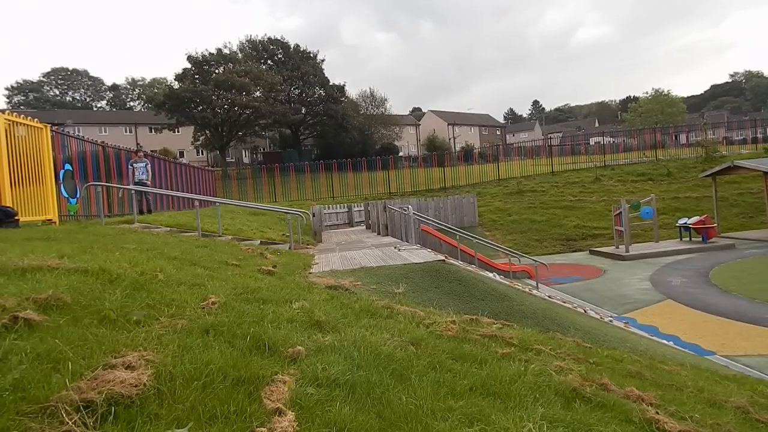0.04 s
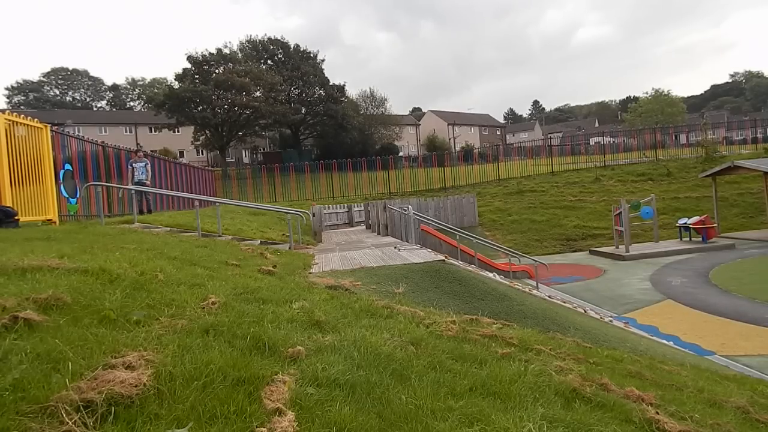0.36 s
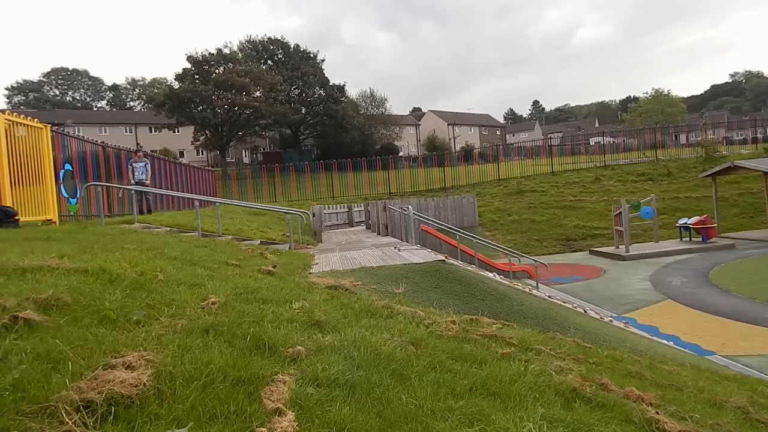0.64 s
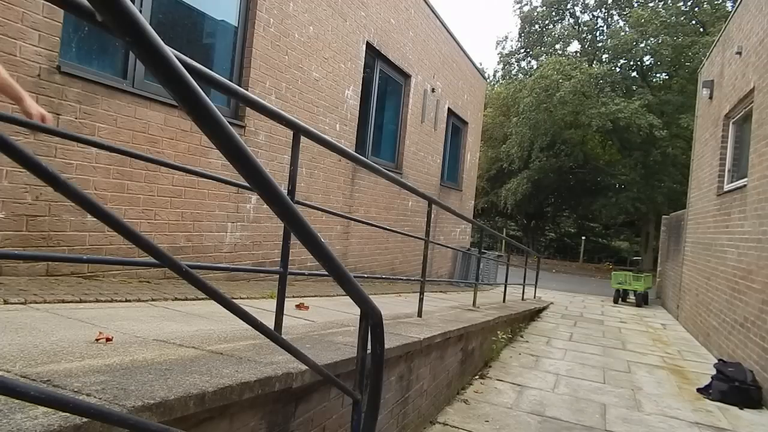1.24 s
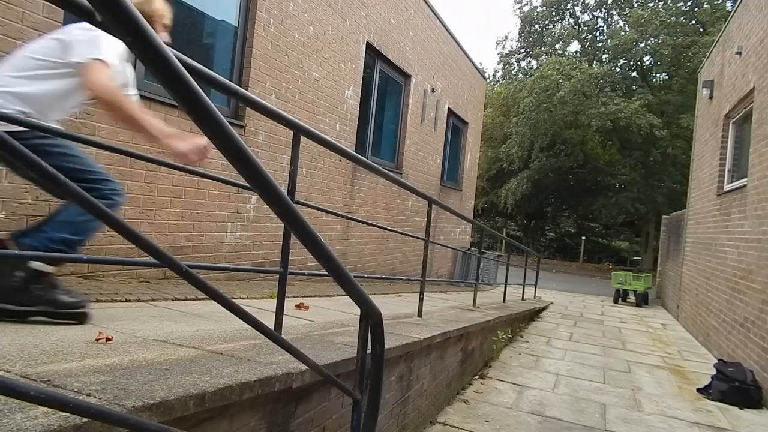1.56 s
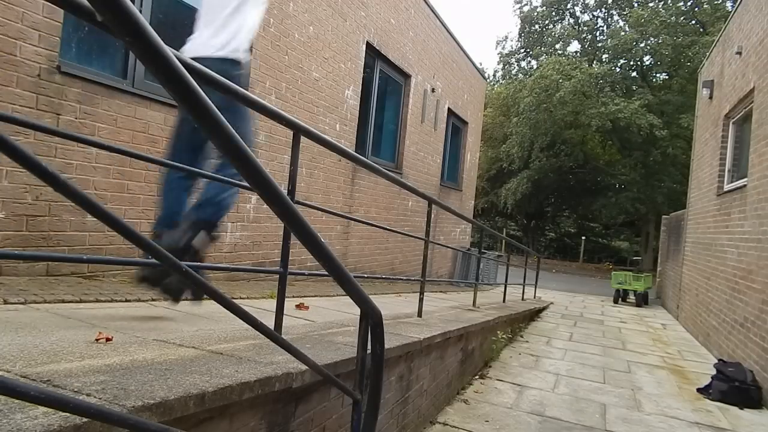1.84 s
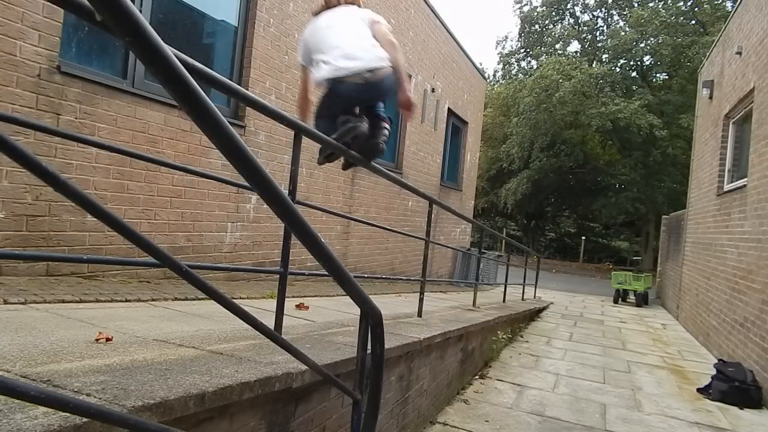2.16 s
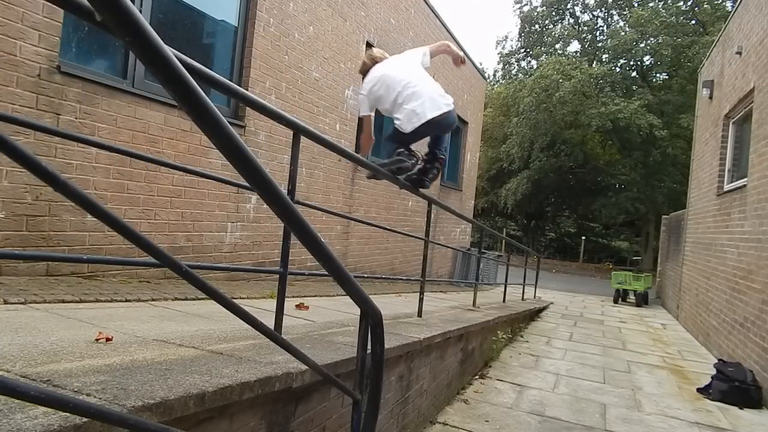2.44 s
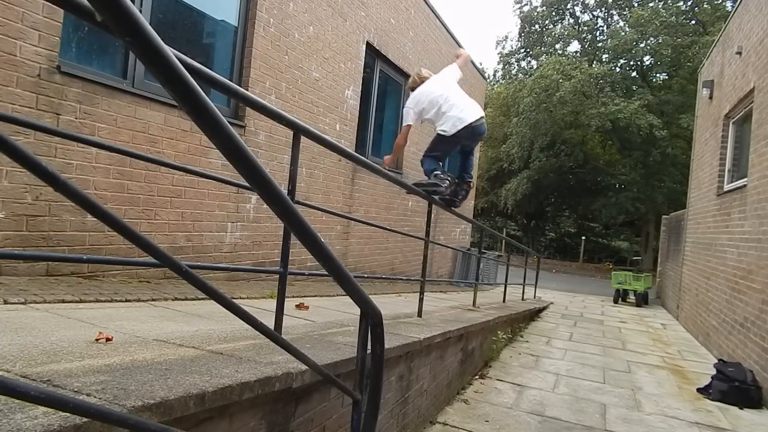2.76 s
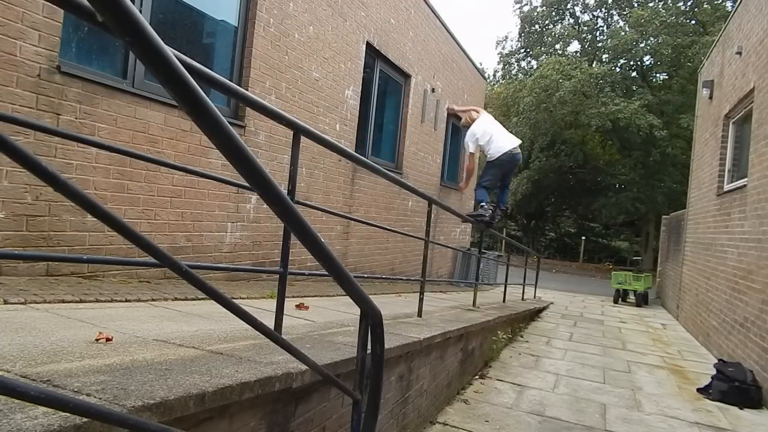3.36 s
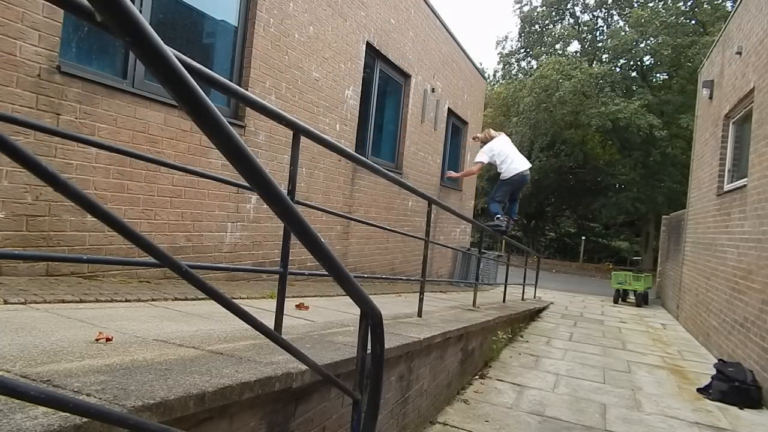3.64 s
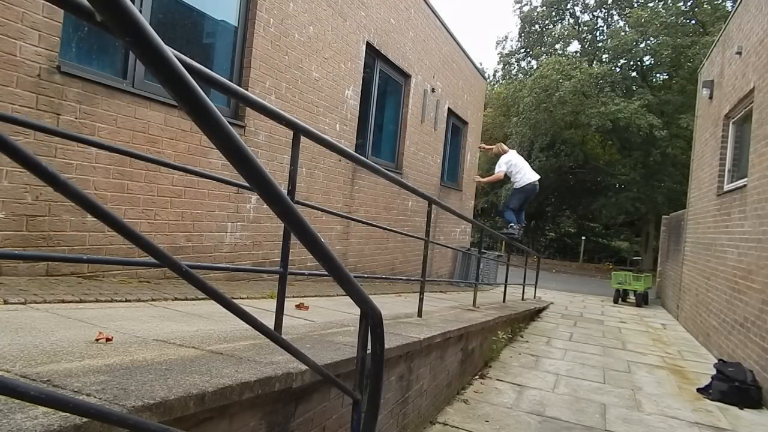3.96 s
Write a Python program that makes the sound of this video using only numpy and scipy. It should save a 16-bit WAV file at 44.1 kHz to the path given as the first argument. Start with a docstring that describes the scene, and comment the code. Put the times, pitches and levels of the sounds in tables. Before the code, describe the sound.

An inline skater, first distant under a light breeze, is abruptly near the microphone in a brick yard. Hard wheels thump and clatter over paving, then the boots hit a metal rail and scrape along as it rings.

```python
"""An inline skater rolls far off in a playground, over a low breeze. From 0.8 s he is close by in a
brick yard: hard wheels roar, thump and clack over paving slabs, and the hollow boots drone.
He jumps, clips a steel handrail at 2.0 s, lands on it with both boots at 2.2 s and grinds along it
while the tube rings, bumping over a joint at 3.3 s. Brick walls answer the blows."""
import sys
import numpy as np
from scipy import signal
from scipy.fft import rfft, irfft, next_fast_len
from scipy.io import wavfile
from scipy.ndimage import map_coordinates

SR = 44100
rng = np.random.default_rng(int(sys.argv[2]) if len(sys.argv) > 2 else 0)


def pcm_store(signal):
    """Save signal as 16-bit PCM."""
    levels = np.round(np.clip(np.atleast_2d(signal), -1, 1) * 32767)
    wavfile.write(sys.argv[1], SR, levels.astype(np.int16).T)


N = 176400
YARD_S, GRIND_S = 0.798, 2.205

# Each row: time in seconds, then scrape, tube ring, hiss and rumble levels in dB.
GRIND_LEVELS = [(2.2, -35, -25.5, -52, -47), (2.3, -26, -27.5, -44, -26.5),
                (2.44, -32.5, -27.5, -51.5, -35.5), (2.58, -32, -30.5, -47.5, -33),
                (2.78, -24.5, -26, -42, -28.5), (2.95, -27, -28, -44.5, -26.5),
                (3.2, -26.5, -27, -44.5, -33.5), (3.42, -23.5, -30.5, -41, -28.5),
                (3.68, -23, -32, -41.5, -28.5), (3.85, -25.5, -33.5, -45, -30),
                (3.99, -26, -24.5, -44.5, -30.5)]
# Friction noise. Each row: frequency in Hz, relative level in dB.
SCRAPE_SPECTRUM = [(100, -14), (270, 0.5), (410, 8.5), (560, 2), (680, 3), (800, -1), (1200, 1),
                   (1600, -1.5), (2200, -6.5), (3000, -14), (4200, -16.5), (7000, -37), (15000, -58)]
GRIND_HISS_SPECTRUM = [(1500, -15), (3300, 0.5), (5000, 5), (7500, 0.5), (10000, 1.5), (12000, 1.5),
                       (15500, -12)]
def grind():
    """The soles chatter along the rail, scraping, hissing and keeping the tube ringing."""
    scrape, ring, hiss, rumble = gains(GRIND_LEVELS)
    contact = fade_in(GRIND_S, 0.02)
    chatter = amp(0.97 * wobble(70))
    scraping = scrape * noise(SCRAPE_SPECTRUM, grit_db=1.5)
    hissing = hiss * noise(GRIND_HISS_SPECTRUM, grit_db=0.5)
    friction = contact * chatter * (scraping + hissing)
    singing = ring * contact * singing_tube()
    body = contact * rumble * amp(0.93 * wobble(20)) * noise(RUMBLE_SPECTRUM)
    wet = amp(-7)  # further off, so more echo
    return (friction + wet * walls(friction)) / np.hypot(1, wet) + singing + body


# Steel tube. Each row: frequency in Hz, width in Hz, relative level in dB, time of strongest drive
# in seconds, fall either side in dB per second.
TUBE_MODES = [(209, 4, -6, 3.2, 6), (330, 6, -11, 3.1, 6), (370.6, 3, -.5, 3.0, 5), (401.5, 12, -5, 2.9, 2),
              (435.3, 2, 2, 2.8, 1), (478, 4, -3, 3.3, 2), (511.2, 2, 5, 2.75, 11), (660, 7, -9, 3.5, 6),
              (805, 3, -11, 3.3, 4), (1152, 5, -13, 3.3, 4), (1460, 4, -11, 3.6, 5),
              (1736, 4, -12.5, 3.0, 2), (2215, 5, -22, 3.0, 2), (2690, 5, -28, 3.0, 2),
              (3172, 4, -21, 2.2, 16), (3778, 5, -27, 2.3, 4), (3952, 12, -27, 2.6, 2),
              (4514, 8, -30, 2.8, 2), (5130, 8, -30, 3.4, 2)]
def singing_tube():
    """Sliding sustains the modes; each swells as the boot passes the spot that drives it best."""
    t, out = clock(), np.zeros(N)
    flutter_db, wander_rad = 3, 0.8
    for hz, width_hz, db, best_s, fall_db_per_s in TUBE_MODES:
        level = amp(db - fall_db_per_s * np.abs(t - best_s) + flutter_db * wobble(17))
        phase = 2 * np.pi * (hz * t + rng.random()) + wander_rad * wobble(2 * width_hz)
        out += level * np.sin(phase)
    return unit(out)


# Boots striking the rail, then jolting on it. Each row: start in seconds, smack in dB, smack t60 in
# seconds, treble in dB, thud in dB, crack in dB. Levels are relative.
LANDINGS = [(2.02, -18.5, 0.14, 1, -12.5, -34), (2.1751, -13.5, 0.15, 5, -45, -11.5),
            (2.202, -18.5, 0.34, 7, -39, -14), (2.21, -9, 0.048, -9, -12.5, -7.5),
            (2.606, -25, 0.034, -9, -33, -26), (2.852, -28.5, 0.027, -17, -30, -31),
            (3.0763, -24, 0.026, -22, -24, -18), (3.599, -23, 0.033, -12, -32, -23),
            (3.668, -22, 0.044, -18, -26, -24)]
# Impact noise. Each row: frequency in Hz, relative level in dB.
SMACK_SPECTRUM = [(100, -37), (400, -2), (750, 1), (1100, -2), (1700, -1), (2400, 1), (3200, -6),
                  (4500, -11), (7500, -19), (11000, -18.5), (15500, -37)]
THUD_SPECTRUM = [(40, -56), (140, 9), (270, -9.5), (400, 6.5), (700, -10), (1100, -13), (2000, -9.5),
                 (4000, -45), (12000, -36)]
def landings():
    """Plastic soles hit the rail: a hard crack, a bright smack and the thud of the skater's weight."""
    out, t = np.zeros((2, N)), np.arange(SR // 4) / SR
    for start_s, db, t60_s, treble_db, thud_db, crack_db in LANDINGS:
        envelope = amp(db) * decay(t, t60_s, attack_s=0.002)
        envelope += amp(crack_db) * decay(t, t60_s=0.015, attack_s=0.00059)
        smack = envelope * noise(SMACK_SPECTRUM, size=len(t), grit_db=1.0, treble_db=treble_db)
        thud = amp(thud_db) * decay(t, t60_s=0.12) * noise(THUD_SPECTRUM, size=len(t))
        add(out, start_s, smack + thud)
    return out


# A sole on the loaded rail. Each row: frequency in Hz, width in Hz, relative gain in dB.
CLANK_MODES = [(628, 34, 2), (772, 30, -6), (1040, 43, -13), (1630, 83, -2), (1860, 34, -4),
               (2110, 42, -11), (2370, 35, -10), (2920, 55, -0.5), (3140, 22, -3), (3690, 22, -1)]
def struck_rail(hits):
    """Each blow sounds directly, clanks briefly and rings the tube's narrow modes."""
    clank = resonate(hits, CLANK_MODES)
    ring = resonate(hits, [row[:3] for row in TUBE_MODES])
    return amp(-2) * hits + amp(-3.5) * clank + amp(-5) * ring


def bump():
    """A dull knock and a little clank as the sole crosses a joint of the rail."""
    knock = amp(-14) * swell(peak_s=3.295, rise_s=0.0075, fall_s=0.011) * noise(THUD_SPECTRUM)
    return knock + amp(-3) * resonate(knock, CLANK_MODES)


# Wheels and boots striking slabs. Each row: start in seconds, clatter in dB, clatter t60 in seconds,
# treble in dB, ring frequency in Hz, ring level in dB.
CLACKS = [(0.2296, -35, .04, -1, 1520, -32), (0.8128, -20, 0.03, 0, 671, -5.5),
          (0.8148, -23.5, 0.096, -1, 440, -5.5), (0.8379, -24.5, 0.079, -15, 480, -6.5),
          (0.924, -27.5, 0.28, -19, 1290, -45), (1.019, -23.5, 0.1, -26, 410, -17),
          (1.141, -22.5, 0.11, -9, 830, -19), (1.167, -17.5, 0.2, -5, 1084, -5),
          (1.184, -22.5, 0.13, -6, 1294, -7), (1.253, -23.5, 0.18, -14, 1120, -17),
          (1.319, -30.5, 0.071, 17, 375, -13), (1.337, -20, 0.095, -6, 1050, -34),
          (1.382, -16.5, 0.097, 1, 580, -14), (1.4749, -9.5, 0.06, -4, 955, -12.5),
          (1.48, -15, 0.08, 0, 249, -11), (1.54, -22.5, 0.13, 8.5, 1500, -15.5),
          (1.558, -24, 0.12, 7, 1620, -14.5), (1.7035, -23.5, 0.1, -3, 394, -12),
          (1.711, -29, 0.027, 0, 414, -10), (1.721, -28, 0.072, 1, 405, -13),
          (1.807, -25, 0.28, 0, 398, -15), (1.866, -31.5, 0.13, 2, 392, -38)]
# Frame rattle. Each row: frequency in Hz, relative level in dB.
CLATTER_SPECTRUM = [(60, -27), (200, -14), (420, 4.5), (700, -7.5), (1150, 2), (1700, -3), (2600, -15),
                    (4500, -25.5), (7500, -31.5), (10500, -26), (15500, -42)]
def clacks():
    """Each strike cracks, rattles the frame and briefly rings two modes of the boot shell."""
    out, t = np.zeros((2, N)), np.arange(SR // 5) / SR

    def mode(hz):
        return decay(t, t60_s=0.042 * np.sqrt(400 / hz), attack_s=0.00073) * np.sin(2 * np.pi * hz * t)

    crack = amp(-8) * decay(t, t60_s=0.0067)
    for start_s, db, t60_s, treble_db, ring_hz, ring_db in CLACKS:
        envelope = decay(t, t60_s, attack_s=0.001) + crack
        clatter = amp(db) * envelope * noise(CLATTER_SPECTRUM, size=len(t), treble_db=treble_db)
        ring = amp(ring_db) * (mode(ring_hz) + amp(-12.5) * mode(1.413 * ring_hz))
        add(out, start_s, clatter + ring)
    return out


# Each row: start in seconds, peak in dB, frequency in Hz.
JOINT_THUMPS = [(0.108, -31.5, 111), (0.343, -30.5, 111), (.548, -36.5, 84), (0.719, -39.5, 95),
                (.921, -15.5, 153), (1.14, -15, 131), (1.188, -16, 133), (1.211, -16, 125),
                (1.254, -14, 140), (1.311, -17, 125), (1.339, -12, 132), (1.355, -16, 127),
                (1.387, -8.5, 135), (1.713, -16.5, 101), (1.8, -27, 125), (1.883, -24, 222)]
def thumps():
    """A few low cycles as a wheel drops into a paving joint."""
    out, t = np.zeros((2, N)), np.arange(SR // 8) / SR
    rise_s = 0.0063
    envelope = (t / rise_s * np.exp(1 - t / rise_s)) ** 1.08
    for start_s, db, hz in JOINT_THUMPS:
        add(out, start_s, amp(db) * envelope * np.sin(2 * np.pi * hz * t))
    return out


# Each row: time in seconds, then wheel, ground rumble and hiss levels in dB.
ROLL_LEVELS = [(.8, -34, -38, -43), (.95, -34, -26.5, -52.5), (1.1, -33.5, -30.5, -54.5),
               (1.2, -33.5, -30, -49), (1.4, -30, -27.5, -47.5), (1.6, -35, -32.5, -51),
               (1.78, -35, -31.5, -52), (1.89, -36.5, -31, -47), (1.97, -37, -37.5, -52.5),
               (2.2, -35, -30, -48)]
# Rolling noise; the grind shares the rumble. Each row: frequency in Hz, relative level in dB.
WHEEL_SPECTRUM = [(150, -46), (290, -15), (400, 2.5), (560, -8.5), (750, -10), (1100, -10), (1650, -12.5),
                  (2600, -21.5), (4500, -35.5), (9000, -50)]
RUMBLE_SPECTRUM = [(20, -40), (45, -15), (75, -7), (125, -3), (165, -0.5), (220, -14.5), (300, -19),
                   (600, -27), (2000, -74)]
WHEEL_HISS_SPECTRUM = [(1500, -15), (3500, 0.5), (7500, -3.5), (10500, 0.5), (15500, -7.5)]
def rolling():
    """Hard wheels on rough slabs: a gritty roar and a faint hiss over a ground rumble."""
    wheel, ground, hiss = gains(ROLL_LEVELS)
    roar = wheel * noise(WHEEL_SPECTRUM) * amp(1.15 * wobble(70.3))
    rumble = ground * noise(RUMBLE_SPECTRUM) * amp(1.1 * wobble(25.15))
    gate = fade_in(YARD_S, 0.0039) * (1 - fade_in(GRIND_S, 0.068))
    return gate * (roar + rumble + hiss * noise(WHEEL_HISS_SPECTRUM))


# Each row: time in seconds, level in dB.
DRONE_LEVELS = [(.8, -42), (1.1, -41.5), (1.35, -34), (1.5, -32), (1.66, -29), (1.73, -43), (1.8, -30),
                (1.95, -47), (2.2, -50)]
# Boot shell. Each row: frequency in Hz, width in Hz, relative gain in dB.
SHELL_MODES = [(262, 58, -5), (405, 26, 3)]
def boot_drone():
    """Rolling keeps the hollow boots droning until the landing."""
    level, = gains(DRONE_LEVELS)
    vibration = noise([(100, 7.0), (600, -4), (2000, -21)])
    gate = fade_in(YARD_S, 0.0056) * (1 - fade_in(GRIND_S, 0.022))
    return level * gate * unit(resonate(vibration, SHELL_MODES))


# Each row: peak time in seconds, level in dB, rise and fall in seconds, left minus right in dB.
SCUFFS = [(.915, -42.5, .012, 0.028, 2), (1.192, -35.5, 0.019, 0.013, 4), (1.392, -37, 0.0046, 0.015, 1),
          (1.523, -31.5, 0.0058, 0.017, -3), (1.918, -36, 0.0057, 0.01, 0), (2.028, -28, 0.013, 0.016, 0),
          (2.176, -29, 0.011, .01, -1), (2.325, -34.5, 0.013, 0.012, -6), (2.773, -26.5, 0.0013, 0.01, -4),
          (3.32, -21.5, 0.015, 0.012, -3.5)]
# Slipping plastic. Each row: frequency in Hz, relative level in dB.
SCUFF_SPECTRUM = [(600, -17), (2000, 9.5), (3500, 0.5), (7000, -5), (10000, 4), (12500, -3), (15500, -15)]
def scuffs():
    """Brief bright slips of plastic on stone or steel."""
    envelope = sum(amp(db) * pan(pan_db) * swell(peak_s, rise_s, fall_s)
                   for peak_s, db, rise_s, fall_s, pan_db in SCUFFS)
    return envelope * noise(SCUFF_SPECTRUM, grit_db=2.5)


# Each row: time in seconds, level in dB.
FAR_ROLL_LEVELS = [(0.0, -52), (0.15, -48.5), (0.215, -45.5), (0.25, -44.5), (0.4, -42.5), (0.6, -42.5),
                   (0.79, -43)]
# Distant wheels and moving air. Each row: frequency in Hz, relative level in dB.
FAR_ROLL_SPECTRUM = [(24, -26), (45, -15), (90, -20), (160, -17), (290, -16), (340, -3), (410, 1),
                     (540, -4), (640, -3), (1030, -9), (1480, -4), (2000, -13.5), (2600, -19.5),
                     (5000, -28.5), (12000, -31.5), (15800, -40)]
BREEZE_SPECTRUM = [(25, -21), (60, 0), (110, 1.5), (170, -5), (250, -11), (500, -25), (2000, -64)]
def playground():
    """Distant wheels over a low, uneven breeze, slightly to the right."""
    level, = gains(FAR_ROLL_LEVELS)
    roll = level * noise(FAR_ROLL_SPECTRUM, grit_db=1) * amp(0.5 * wobble(39.8))
    breeze = amp(-53.5 + 1.7 * wobble(16.2)) * noise(BREEZE_SPECTRUM)
    gate = 1 - fade_in(YARD_S, 0.0053)
    return from_left(gate * (roll + breeze), lead_s=-0.00015) * pan(-1.4)


# Each row: frequency in Hz, echo t60 in seconds.
WALL_DECAY = [(150, 0.18), (1500, 0.15), (10000, 0.28)]
def walls(x):
    """The brick yard's echo, 10 ms late; each frequency dies at its own speed."""
    hz, t, bands = signal.stft(noise([(100, 1), (15000, -5.5)], size=SR // 2), SR, nperseg=256)
    bands = bands * amp(-60 * t / along(WALL_DECAY, hz)[:, None])
    tail = signal.istft(bands, SR, nperseg=256)[1]
    tail = np.pad(tail / np.linalg.norm(tail[0]), ((0, 0), (SR // 100, 0)))
    return signal.fftconvolve(x.mean(0)[None], tail, axes=1)[:, :N]


# Scattered sound. Each row: frequency in Hz, left-right coherence from -1 to 1.
COHERENCE = [(100, 0.97), (300, 0.96), (500, 0.93), (1000, 0.77), (2000, 0.084), (3000, -0.12),
             (4200, -0.23), (7000, -0.053), (15000, 0.12)]
def noise(spectrum, size=N, grit_db=0, treble_db=0):
    """Coloured stereo noise of rms 1; grit clumps it into tiny impacts."""
    def response(hz):
        angle = np.arccos(np.clip(along(COHERENCE, hz), -1, 1)) / 2
        colour = amp(along(spectrum, hz) + treble_db * along([(1800, 0), (6000, 0.95)], hz))
        return colour * np.array([np.cos(angle), np.sin(angle)])

    pair = rng.standard_normal((2, size))
    if grit_db:
        pair *= amp(grit_db * wobble(700)[:size])
    mid, side = filtered(pair, response)
    return unit(np.array([mid + side, mid - side]))


def amp(db):
    return 10 ** (np.asarray(db) / 20)


def pan(db):
    """Stereo gains, left louder by db."""
    return amp(db * np.array([[0.5], [-0.5]]))


def unit(x):
    """Scale to rms 1."""
    return x / np.sqrt(np.mean(x ** 2) + 1e-20)


def clock():
    return np.arange(N) / SR


def along(points, hz):
    """Interpolate (Hz, value) points on a log axis."""
    knots_hz, values = np.transpose(points)
    return np.interp(np.log(hz + 1), np.log(knots_hz + 1), values)


def gains(rows):
    """One gain per sample for each dB column after the time."""
    times_s, *columns_db = np.transpose(rows)
    return [amp(np.interp(clock(), times_s, db)) for db in columns_db]


def fade_in(start_s, length_s):
    return np.clip((clock() - start_s) / length_s, 0, 1)


def decay(t, t60_s, attack_s=0.00019):
    """Fast rise, exponential fall."""
    return amp(-60 * t / t60_s) * (1 - np.exp(-t / attack_s))


def swell(peak_s, rise_s, fall_s):
    """An exponential cusp."""
    t = clock() - peak_s
    return np.exp(np.where(t < 0, t / rise_s, -t / fall_s))


def wobble(knots_per_s):
    """A smooth random curve."""
    return map_coordinates(rng.standard_normal(N // 16), [clock() * knots_per_s], mode="wrap")


def filtered(x, response):
    """Apply a response given as a function of Hz."""
    size = x.shape[-1]
    padded = next_fast_len(size + size // 4)
    return irfft(rfft(x, padded) * response(np.fft.rfftfreq(padded, 1 / SR)), padded)[..., :size]


def resonate(force, modes):
    """Drive (Hz, width Hz, dB) resonances."""
    return filtered(force, lambda hz: sum(
        amp(db) * 1j * hz * width_hz / (mode_hz ** 2 - hz ** 2 + 1j * hz * width_hz)
        for mode_hz, width_hz, db in modes))


def from_left(x, lead_s):
    """The left channel leads; a negative lead favours the right."""
    return filtered(x, lambda hz: np.exp(1j * np.pi * hz * lead_s * np.array([[1], [-1]])))


def add(track, start_s, sound):
    part = track[:, round(start_s * SR):][:, :sound.shape[-1]]
    part += sound[..., :part.shape[1]]


def scene():
    """The playground, then the yard: the run-up comes from the left, the rail lies straight ahead."""
    rail = struck_rail(landings())
    run_up = from_left(rolling() + boot_drone() + clacks(), lead_s=0.000099)
    near = run_up + rail + bump() + scuffs()
    return playground() + thumps() + near + amp(-9) * walls(near) + grind()


# Each row: frequency in Hz, left minus right in dB.
MIC_BALANCE = [(60, -3.5), (500, -3.5), (2000, -3.5), (5000, -1), (11000, 0)]
# Each row: centre in Hz, width in Hz, depth from 0 to 1.
MIC_DIPS = [(2510, 22, 1), (7480, 40, 0.98)]
def record(dry):
    """The microphone favours its right side and has two narrow dips and a band limit."""
    def response(hz, top_hz=15900):
        dips = [1 - depth / (1 + ((hz - centre_hz) / width_hz) ** 2)
                for centre_hz, width_hz, depth in MIC_DIPS]
        return pan(along(MIC_BALANCE, hz)) * np.prod(dips, axis=0) * (hz < top_hz)

    return filtered(dry, response)


dry = scene()
out = record(dry)
pcm_store(out)
```